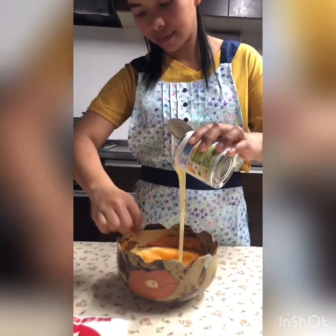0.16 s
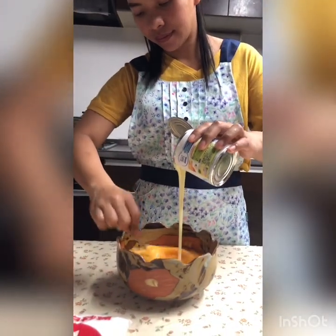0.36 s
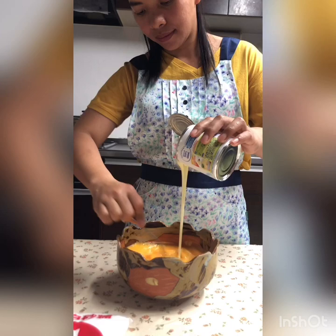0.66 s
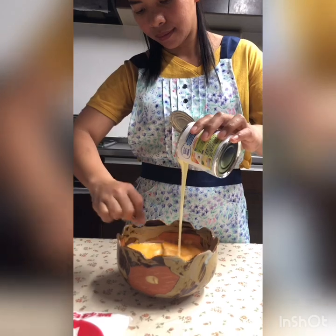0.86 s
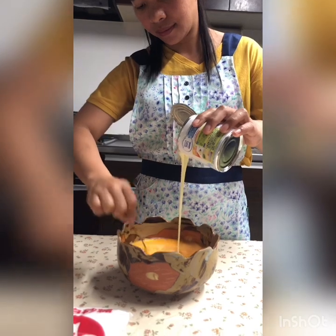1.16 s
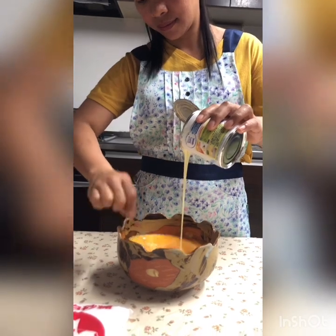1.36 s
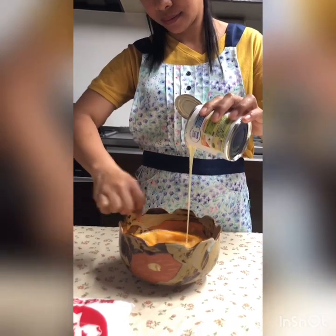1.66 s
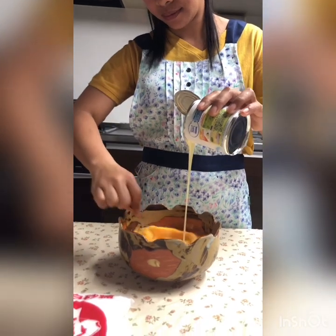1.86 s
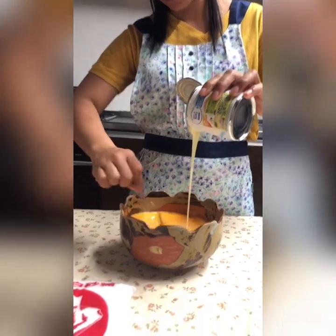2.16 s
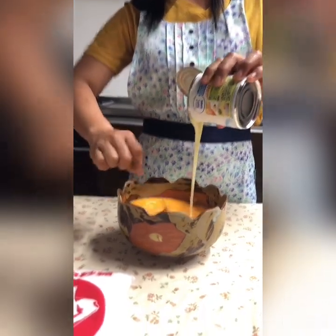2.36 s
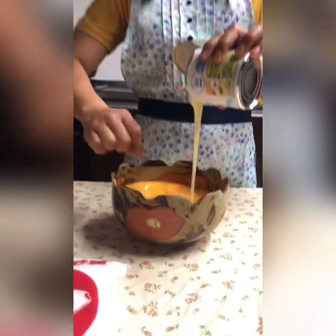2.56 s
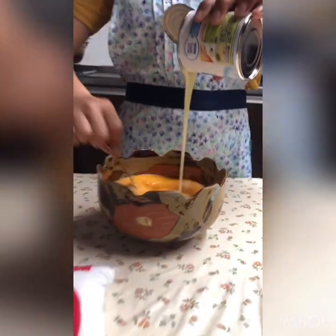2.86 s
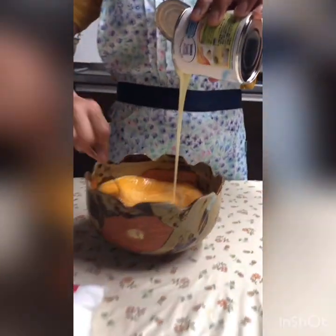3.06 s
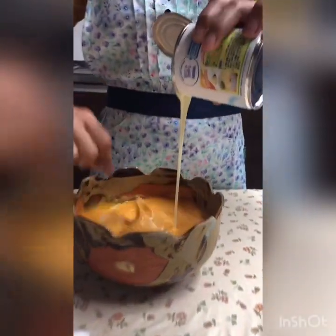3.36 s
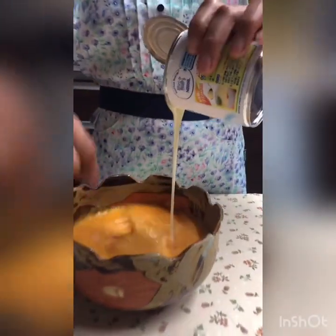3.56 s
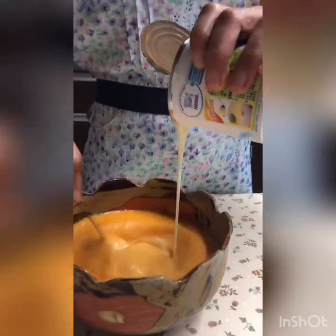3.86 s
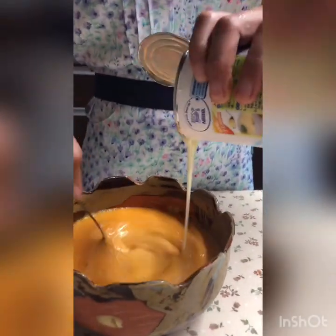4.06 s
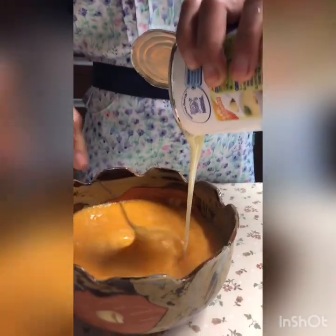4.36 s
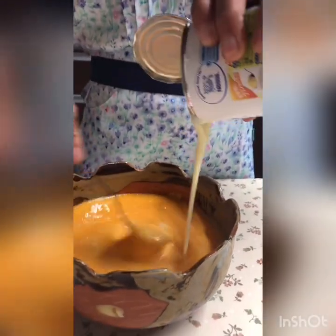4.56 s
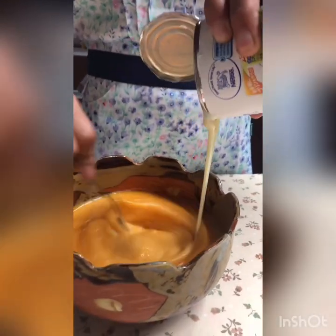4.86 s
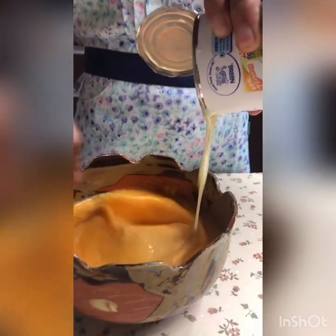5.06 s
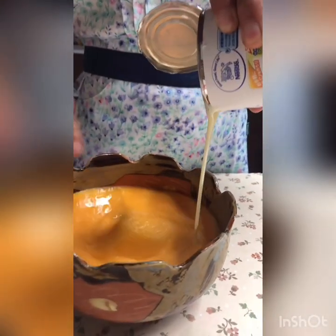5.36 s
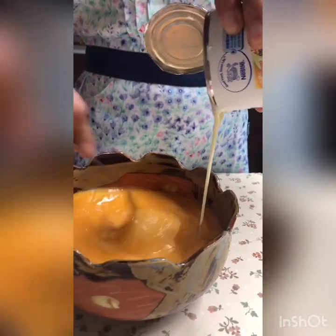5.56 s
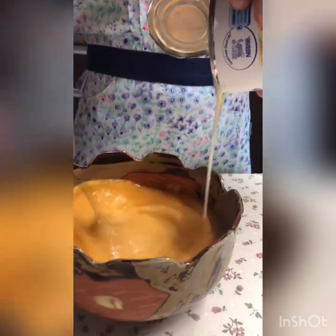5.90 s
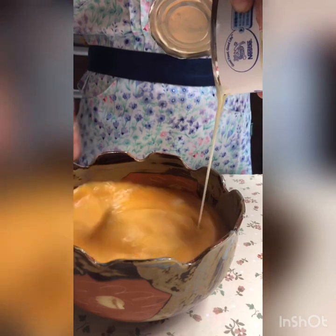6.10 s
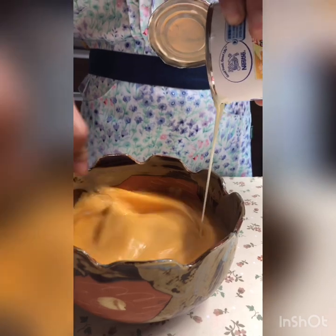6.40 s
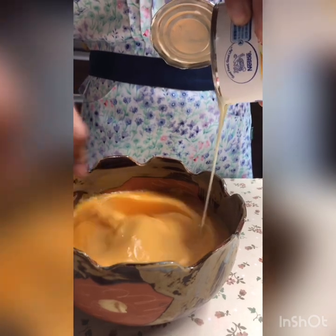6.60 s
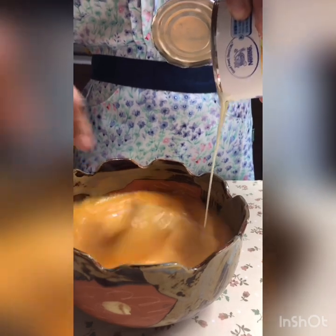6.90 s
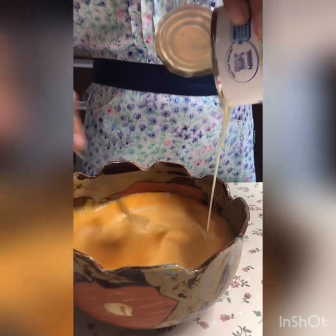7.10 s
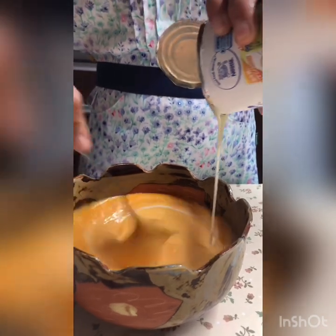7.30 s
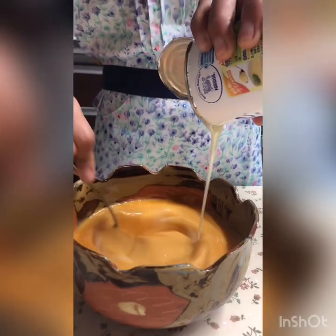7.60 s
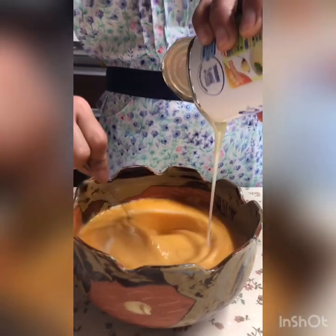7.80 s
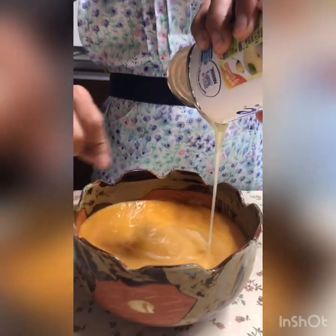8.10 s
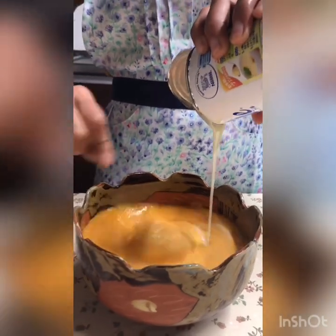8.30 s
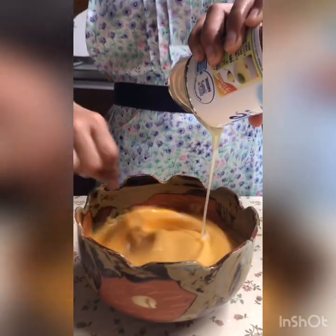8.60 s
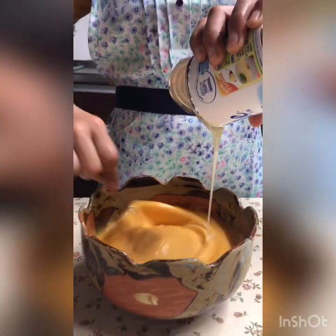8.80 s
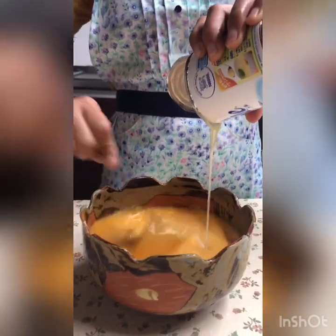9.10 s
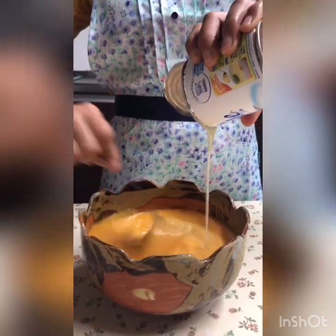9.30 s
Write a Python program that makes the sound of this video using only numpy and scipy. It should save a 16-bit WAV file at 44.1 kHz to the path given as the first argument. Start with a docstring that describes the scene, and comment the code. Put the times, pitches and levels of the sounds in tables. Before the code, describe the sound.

Steady quick stirring: steel spoon knocks on the wall of a filled ceramic bowl, each a bright dry clack with a dull thump from the table. Short dense kitchen reflections are prominent early, then recede as the microphone nears and blows harden. Small scrapes and bubbly fizz come just before the hits, with one very sharp tick past the middle, a few louder liquid pops later, and low room rumble with light hiss throughout.

```python
"""A metal spoon beats eggs in a bowl on a table in a small kitchen, about five strokes a second.
At first the blows are light, often preceded by a graze; each is a damped impact clack with a low modal thump.
Just before each contact, bubbles fizz in the egg; the room answers with dense, decaying reflections.
From about 2.7 s the blows strengthen and the echo falls back; at 5.7 s a Gaussian pulse of treble ticks.
Short gliding pops and faint touches lie near the blows, loudest at 6.1, 6.9 and 9.3 s, over rumble and hiss."""
import sys
import numpy as np
from scipy import signal
from scipy.fft import rfft, irfft
from scipy.io import wavfile

SR = 44100
rng = np.random.default_rng(int(sys.argv[2]) if len(sys.argv) > 2 else 0)


def bounce(signal):
    """Save signal as a 16-bit WAV file at the path given by the first command-line argument."""
    frames = np.transpose(np.atleast_2d(signal))
    limited = np.clip(frames, -1, 1)
    pcm = np.round(limited * 32767).astype(np.int16)
    wavfile.write(sys.argv[1], SR, pcm)


N = 416744

# register edges, from the hollow knock of the filled bowl to the tick of the steel: (frequency [Hz])
REGISTER_EDGES = [600, 1600, 3100, 5200, 9000, 16500]
# modes of bowl and spoon, damped by the mixture:
# (mean frequency [Hz], mean level within the register [dB], decay time T60 [s])
BOWL_MODES = [(822, -10.5, 0.049), (1112.4, -8.5, .014), (1338, 11, 0.037), (1850, -2.5, 0.024),
              (2102, 5.5, 0.022), (2370, 2.5, 0.022), (2768, 3, 0.025), (3550, -1.5, 0.0077),
              (3620, 4, 0.015), (4280, -1.5, 0.018), (6085, -1.5, 0.015), (6300, 3.5, 0.0046),
              (7180, 2.5, 0.011), (7870, -8.5, .011), (9520, 8, 0.01), (10090, 6.5, 0.015),
              (11560, 5, .012), (12600, -28.5, 0.0033), (14400, -3, .01), (15100, 9.5, 0.01)]
# low modes of the table top, with two faint room resonances near 340 and 400 Hz:
# (mean frequency [Hz], mean relative level [dB], decay time T60 [s])
THUMP_MODES = [(64.6, -11.5, 0.15), (96.8, -7.5, 0.17), (128, -10, 0.36), (162.4, 0.5, 0.23),
               (158.47, 4, 0.16), (179.4, -2, 0.17), (262, -12, 0.019), (315.3, -8, 0.038),
               (452, -10, 0.025), (339.7, -31, 0.12), (398, -31.5, 0.5)]
# kitchen decay: (frequency [Hz], decay time T60 [s])
ROOM_T60 = [(300, 0.16), (1300, 0.31), (3500, 0.23), (8000, 0.26), (15000, 0.08)]
# kitchen colour: (frequency [Hz], reverberation level [dB])
ROOM_COLOUR = [(200, 3.5), (700, 3), (1300, -3), (2500, -6.5), (3700, -4.5), (5000, -8), (10000, -7),
               (15000, -4)]
# spectral shape of the steady background: (frequency [Hz], relative density [dB per Hz])
BACKGROUND_SHAPE = [(20, -24), (35, -8.5), (157, -5.5), (252, -11), (394, -17.5), (600, -20), (1010, -27.5),
                    (2120, -43.5), (3600, -33.5), (5500, -46), (8800, -46), (11000, -24), (11850, -17.5),
                    (12700, -22.5), (16000, -30.5)]
# spectral shape of the wet fizz: (bubble frequency [Hz], relative level [dB])
FIZZ_SHAPE = [(300, -14), (900, -12), (2200, -5.5), (4000, -2), (8000, 3), (13000, -6)]
# short pops and faint touches near the blows, each a few cycles at one gliding pitch:
# (time [s], envelope peak [dB], middle of the pitch glide [Hz])
SHORT_POPS = [(.0686, -41.5, 880), (0.4428, -33.5, 2490), (.4629, -37, 2938), (.519, -28.5, 1970),
              (1.0862, -43, 2310), (1.3845, -44, 1390), (2.338, -41, 910), (2.53, -35, 856),
              (2.667, -43, 1510), (2.977, -41, 2170), (2.9984, -33.5, 5300), (3.39, -48, 237),
              (3.397, -47.5, 426), (3.5146, -39, 1120), (4.6702, -36, 2820), (4.96, -34.5, 6400),
              (4.9792, -35.5, 3320), (5.6026, -40, 2010), (6.1316, -17.5, 6380), (6.1311, -23, 1680),
              (6.133, -36, 895), (6.499, -37.5, 1170), (6.8966, -17.5, 1390), (6.8979, -16.5, 1020),
              (6.8968, -28.5, 780), (7.2872, -52, 985), (7.9005, -42, 4345), (8.1041, -37, 960),
              (8.1045, -32.5, 1760), (8.766, -38.5, 1660), (9.2786, -42, 2300), (9.2912, -14, 1380),
              (9.2917, -22, 930), (9.2915, -28, 795)]
# one bare, very sharp tick of the steel: (time [s], peak [dB], frequency [Hz], half width at 1/e [s])
SHARP_TICK = (5.7373, -1.5, 12000, .00011)
# the microphone moves in on the bowl, so the echo falls back: (time [s], echo level [dB])
ECHO_LEVEL = [(0, 2.5), (2.5, 1), (3.7, -4.5), (9.4, -4)]
# one blow on the wall in each turn: (time [s], contact time [s], clack level before register colour [dB],
# table thump level [dB], brightness [dB per octave], frequency favoured by the spot [Hz])
BLOWS = [(0.0828, 0.0029, -42.5, -37, 0.1, 2217), (0.2719, 0.0009, -43, -38.5, 0, 2217),
         (0.48, 0.0012, -42.5, -37.5, -1, 2820), (.672, 0.0012, -42, -37.5, 1.5, 2820),
         (0.8626, 0.0038, -43, -38, 0, 2650), (1.0368, 0.0033, -40.5, -35.5, 0.5, 2150),
         (1.2326, 0.0014, -42.5, -38, -.7, 2650), (1.4158, .0007, -41.5, -36.5, 0.3, 2670),
         (1.6087, .0015, -40, -37.5, 0, 2800), (1.7902, .001, -42, -37, 0.5, 2650),
         (1.977, 0.00066, -44.5, -39.5, 0, 2600), (2.166, 0.00088, -45, -38, 0.5, 2110),
         (2.3779, 0.0043, -42.5, -38.5, 0.5, 3445), (2.5678, 0.00079, -39.5, -38.5, -0.5, 2170),
         (2.75, .0005, -36, -32.5, -0.5, 3300), (2.9408, 0.0021, -35.5, -33, 0.9, 2070),
         (3.148, 0.00034, -36.5, -31, 0.6, 3360), (3.3483, 0.00068, -39.5, -34, 0.1, 2730),
         (3.5466, 0.00052, -36.5, -34, -.3, 2130), (3.765, 0.00036, -39, -35.5, 1, 2730),
         (3.9602, .0012, -38.5, -35.5, -.9, 2090), (4.1712, 0.0012, -38, -36, 0, 3660),
         (4.3826, 0.00085, -35.5, -33.5, -.5, 2070), (4.5919, 0.00041, -33.5, -35, 0.6, 1870),
         (4.797, .0009, -35.5, -31, -0.7, 2020), (5.0039, 0.00068, -36.5, -34.5, 0.2, 2240),
         (5.198, .0004, -33.5, -34, -0.3, 3580), (5.392, 0.00077, -39.5, -35.5, -0.1, 2220),
         (5.5683, 0.00072, -35.5, -31.5, -1.5, 2045), (5.767, 0.00076, -35.5, -32.5, 0, 2090),
         (5.961, 0.00058, -38, -37, 0.6, 3490), (6.1315, 0.00049, -32.5, -29.5, -0.7, 6150),
         (6.3375, 0.0012, -39.5, -36, -1.9, 3510), (6.5268, 0.0013, -33.5, -32, -0.7, 3600),
         (6.714, 0.0011, -33.5, -31, .4, 2070), (6.9038, .001, -32.5, -27.5, 0.5, 3680),
         (7.1145, 0.0011, -36, -31, 1.3, 2090), (7.326, 0.00087, -39.5, -37, 0, 2800),
         (7.5252, 0.00048, -40, -39.5, 0, 3700), (7.7531, 0.0006, -42.5, -39.5, .7, 2170),
         (7.9416, 0.0021, -39.5, -38.5, -0.5, 2110), (8.1323, 0.0011, -38.5, -33.5, -0.5, 1830),
         (8.3351, 0.00092, -36, -33.5, 0.5, 2200), (8.526, 0.00075, -35.5, -32, 0.4, 6200),
         (8.7198, 0.00085, -32, -30, 0, 1860), (8.9214, 0.0014, -32.5, -29.5, -.6, 2320),
         (9.1107, 0.00076, -34.5, -31, .2, 2370), (9.301, .001, -34, -33, -0.7, 3700)]
# colour of a blow: (level in each register [dB])
BLOW_COLOUR = [-13, -2.5, -6, -4, -0.5]
# light grazes in some turns: (time [s], contact time [s], level before register colour [dB],
# table thump level [dB], frequency favoured by the spot [Hz])
GRAZES = [(0.0388, 0.0023, -52, -64, 1300), (0.0603, 0.004, -52.5, -55, 3200),
          (0.243, 0.0018, -59, -52, 9500), (.4435, .0016, -48, -65, 2410), (.519, 0.00093, -50, -69, 2050),
          (1.008, 0.0057, -52, -75, 4420), (1.383, 0.0022, -49.5, -63, 1340),
          (1.5758, 0.00058, -39.5, -45, 2800), (1.757, 0.00032, -42.5, -53, 5840),
          (2.338, 0.0043, -44.5, -46.5, 1600), (2.53, 0.00057, -41, -40.5, 2800),
          (2.716, 0.00042, -41, -63, 3970), (2.9067, 0.0044, -51, -68, 4000),
          (3.5139, 0.0029, -38, -50, 4440), (3.721, .0004, -47.5, -50, 11000),
          (4.345, .001, -56.5, -69, 12000), (5.164, .0005, -50.5, -60, 6300),
          (5.3664, .0016, -48, -54, 8900), (5.5329, .0007, -39.5, -51, 3700),
          (5.7364, .0004, -31, -39, 12400), (6.4971, .003, -39, -45, 4300),
          (6.5555, 0.00056, -44.5, -60, 2270), (6.6905, .0018, -30, -39.5, 12130),
          (6.888, .0004, -42, -56.5, 6300), (6.8957, 0.00018, -31.5, -47, 4300),
          (7.08, .0007, -47, -49, 12100), (7.2994, 0.00062, -34.5, -51, 3700),
          (7.499, 0.00084, -56.5, -68, 3600), (7.915, 0.00024, -49.5, -68, 14050),
          (8.104, .002, -45.5, -45, 12100), (8.2995, 0.0036, -49.5, -44, 12000),
          (8.4976, .0014, -41.5, -42, 5000), (8.6984, 0.00055, -33, -42.5, 12000),
          (8.8975, 0.0017, -35, -38.5, 7500), (9.0902, .0004, -44.5, -42, 6300),
          (9.2887, 0.0011, -40, -36.5, 7300), (9.2933, 0.0011, -40.5, -43.5, 3700)]
# colour of a graze: (level in each register [dB])
GRAZE_COLOUR = [-1, -4.5, -.5, -0.71, 1.5]


def gain_of(db):
    """Level law: amplitude grows tenfold for every 20 dB."""
    return 10 ** (np.asarray(db) / 20)


def unit(x):
    """Energy normalization: each row is scaled to an energy of one."""
    return x / np.sqrt(np.sum(x ** 2, axis=-1, keepdims=True) + 1e-20)


def read(points, hz):
    """Linear interpolation of a spectral table along a logarithmic frequency axis."""
    f, value = np.transpose(points)
    return np.interp(np.log(hz + 1), np.log(f), value)


def add(mix, s, sound):
    """Superposition: a sound starting at time s is summed into the mix."""
    part = mix[max(round(s * SR), 0):][:len(sound)]
    part += sound[:len(part)]


def ring(modes, t):
    """Modal superposition: exponentially dying sines, neighbours starting in opposite directions."""
    out = 0
    for k, (hz, db, t60) in enumerate(modes):
        envelope = gain_of(db - 60 * t / t60)
        out = out + (-1) ** k * envelope * np.sin(2 * np.pi * hz * t)
    return out


def contacts(blow_focus_db=3, graze_focus_db_per_octave=5):
    """Impact excitation: rows of (s, contact time s, thump dB, favoured Hz, dB in each register)."""
    lows, highs = np.array(REGISTER_EDGES[:-1]), np.array(REGISTER_EDGES[1:])
    octave = np.log2(lows * highs) / 2  # register centres
    rows = []
    for s, contact, db, thump_db, brightness, hz in BLOWS:  # a full blow wakes every register
        tilt = brightness * (octave - octave.mean())
        focus = blow_focus_db * ((lows <= hz) & (hz < highs))
        colour = np.array(BLOW_COLOUR) + tilt + focus
        rows.append((s, contact, thump_db, hz, *(db + colour)))
    for s, contact, db, thump_db, hz in GRAZES:  # a graze speaks mainly around one pitch
        colour = np.array(GRAZE_COLOUR) - graze_focus_db_per_octave * abs(octave - np.log2(hz))
        rows.append((s, contact, thump_db, hz, *(db + colour)))
    return np.array(rows)


def spot_lift(hz, spot_hz, lift_db=14.5, width_octaves=0.19):
    """Position-dependent modal excitation: modes near the pitch favoured by the struck spot gain level."""
    return lift_db * np.exp(-(np.log2(hz / spot_hz) / width_octaves) ** 2)


def clacks(spot_share=1, crack_db=-3, crack_t60=0.015, detune=0.029, grit=1.47, firm_contact=0.0004, spot_db=2.0):
    """Impact response: a brief chattering force convolves with damped modes, weighted by place and register."""
    s, contact, _, spot_hz, *levels_db = contacts().T[:, :, None]
    t = np.arange(768) / SR
    chatter, crack = rng.standard_normal((len(s), 2, len(t))).transpose(1, 0, 2)
    # one impulse at landing, then chatter of energy grit squared
    force = grit * unit(chatter * np.exp(-t / contact)) + (t == 0)

    # mixture depth shifts the modes (detune = relative deviation); spots favour others (deviation spot_db)
    shift, favour = rng.standard_normal((len(s), 2, len(BOWL_MODES), 1)).transpose(1, 2, 0, 3)
    modes = []
    for (hz, db, t60), a, b in zip(BOWL_MODES, shift, favour):
        mode_db = db + spot_share * spot_lift(hz, spot_hz) + spot_db * b
        modes.append((hz * (1 + detune * a), mode_db, t60))

    # a very brief touch gives a bare tick with hardly any ring
    firmness = np.clip(contact / firm_contact, .3, 1)
    crack = crack * gain_of(-60 * t / (crack_t60 * firmness))
    blows = 0
    for lo, hi, db in zip(REGISTER_EDGES, REGISTER_EDGES[1:], levels_db):
        in_register = [m for m, row in zip(modes, BOWL_MODES) if lo <= row[0] < hi]
        body = signal.fftconvolve(force, ring(in_register, t), axes=1)[:, :len(t)]
        band = signal.butter(4, (lo, hi), "bandpass", fs=SR, output="sos")
        tone, tick = unit(signal.sosfilt(band, [body, crack]))
        register_sound = unit(firmness * tone + gain_of(crack_db) * tick)
        blows = blows + gain_of(db) * np.sqrt(SR / 100) * register_sound  # dB = RMS referred to 10 ms
    out = np.zeros(N)
    for when, blow in zip(s[:, 0], blows):
        add(out, when, blow)
    return out


def thumps_and_resonances(lag=0.0029, detune=0.0069, spot_db=1):
    """Modal excitation: contacts shake the table through the bowl's foot and wake two faint room resonances."""
    out, t = np.zeros(N), np.arange(SR // 4) / SR
    for s, _, db, *_ in contacts():
        chance = rng.standard_normal((len(THUMP_MODES), 2))  # no two thumps are quite alike
        modes = [(hz * (1 + detune * a), mode_db + spot_db * b, t60)
                 for (hz, mode_db, t60), (a, b) in zip(THUMP_MODES, chance)]
        add(out, s + lag, gain_of(db) * ring(modes, t))
    return out


def short_pops(cycles=1.31, droop=0.37, droop_time=0.0032):
    """Transient oscillation: each pop or touch swells and dies within a few cycles while its pitch sinks."""
    out, t = np.zeros(N), np.arange(1024) / SR
    for s, db, hz in SHORT_POPS:
        age = t * hz / cycles
        gliding_hz = hz * (1 + droop * (np.exp(-t / droop_time) - .5))
        turns = np.cumsum(gliding_hz) / SR
        add(out, s, gain_of(db) * age * np.exp(1 - age) * np.sin(2 * np.pi * turns))
    return out


def sharp_tick():
    """Time-bandwidth principle: a contact this brief emits only a few cycles of the highest treble."""
    s, db, hz, width = SHARP_TICK
    t = np.arange(N) / SR - s
    return gain_of(db) * np.exp(-(t / width) ** 2) * np.cos(2 * np.pi * hz * t)


def mixture_fizz(level_db=-68, per_s=2600, idle=0.03, lead=0.022, spread=0.014, cycles=1.3, size_db=2.0, count=24):
    """Random bubble resonance: tiny bubbles of many pitches crowd where the spoon sweeps down towards the bowl."""
    time, t = np.arange(0, N, 100) / SR, np.arange(600) / SR
    # activity is a Gaussian centred lead seconds before each contact, with deviation spread seconds
    sweep = np.max([np.exp(-.5 * ((time - row[0] + lead) / spread) ** 2) for row in contacts()], axis=0)
    activity = idle + np.interp(np.arange(N) / SR, time, sweep)
    chance = per_s / count / SR * activity  # per sample and pitch
    out = np.zeros(N)
    sizes = gain_of(size_db * np.minimum(rng.exponential(1, N), 3))
    for hz in np.geomspace(500, 13000, count):
        age = t * hz / cycles
        envelope = gain_of(level_db + read(FIZZ_SHAPE, hz)) * age * np.exp(1 - age)
        bubble = envelope * np.sin(2 * np.pi * hz * t)
        for i in np.flatnonzero(rng.random(N) < chance):
            add(out, i / SR, sizes[i] * bubble)
    return out


def kitchen(x, first=.008, early_db=4, early_fade=0.0017):
    """Reverberant decay: dense reflections from one side of the room die at a rate set by frequency."""
    t = np.arange(SR // 2) / SR
    taps = rng.standard_normal(len(t)) * (t > first)
    hz, when, z = signal.stft(taps / np.sqrt(SR), SR, nperseg=128)
    t60 = read(ROOM_T60, hz)[:, None]
    early_lift = early_db * np.exp(-np.maximum(when - first, 0) / early_fade)
    shape_db = read(ROOM_COLOUR, hz)[:, None] - 60 * when / t60 + early_lift
    even_energy = np.sqrt(2 * np.log(1000) / t60)  # offsets the effect of decay time on band energy
    tail = signal.istft(z * gain_of(shape_db) * even_energy, SR, nperseg=128)[1]
    return signal.oaconvolve(x, tail)[:N]


def background(level_db=-61.5):
    """Stationary noise: spectral weighting of white noise gives low room rumble and microphone hiss."""
    weight = gain_of(read(BACKGROUND_SHAPE, np.fft.rfftfreq(N, 1 / SR)))
    noise = irfft(rfft(rng.standard_normal(N)) * weight, N)
    return gain_of(level_db) * np.sqrt(N) * unit(noise)  # level is RMS


def scene(thump_room_db=-9, pop_room_db=-5, echo_spot_share=.3, count=3):
    """Superposition of direct and reflected sound: bowl, mixture and table in the kitchen."""
    small = short_pops() + mixture_fizz() + sharp_tick()
    thumps = thumps_and_resonances()
    to_room = gain_of(pop_room_db) * small + gain_of(thump_room_db) * thumps
    # the bowl radiates a different fine spectrum towards each wall, so the echo is denser than the clack
    echo = sum(kitchen(clacks(echo_spot_share) + to_room) for _ in range(count)) / np.sqrt(count)
    echo *= gain_of(np.interp(np.arange(N) / SR, *np.transpose(ECHO_LEVEL)))
    return (clacks() + small + thumps + echo + background())[None]


def record(dry, low_cut_hz=47, edge_hz=16350):
    """Band limitation: a small microphone lacks deep bass, and the recorder cuts the highest treble."""
    thin = signal.sosfilt(signal.butter(2, low_cut_hz, "highpass", fs=SR, output="sos"), dry)
    lowpass = signal.firwin(255, edge_hz, window=("kaiser", 8), fs=SR)
    return signal.oaconvolve(thin, lowpass[None], "same")


dry = scene()
out = record(dry)
bounce(out)
```